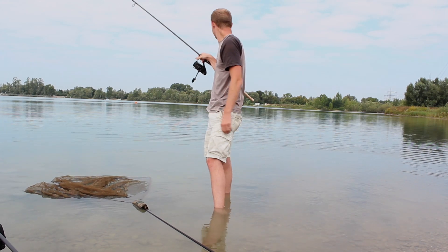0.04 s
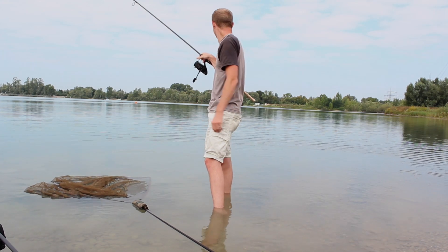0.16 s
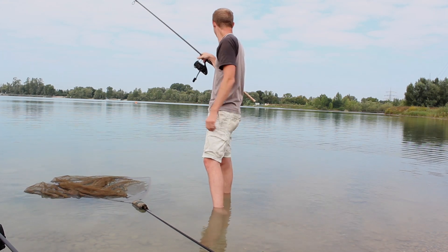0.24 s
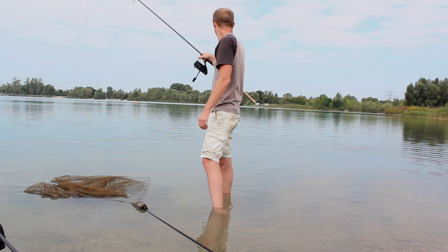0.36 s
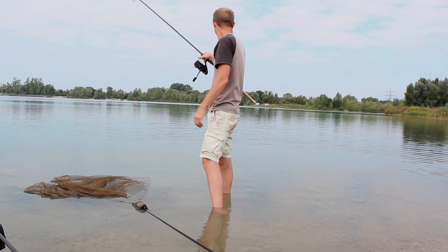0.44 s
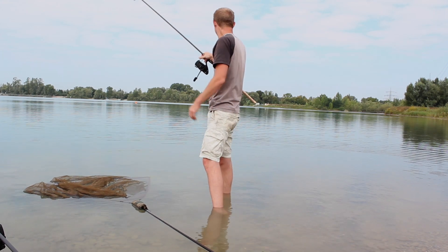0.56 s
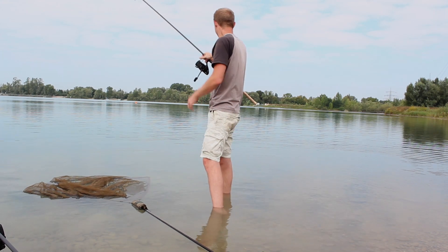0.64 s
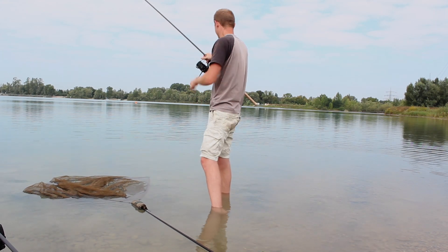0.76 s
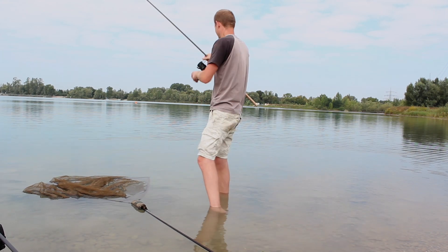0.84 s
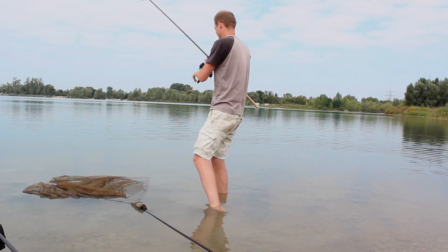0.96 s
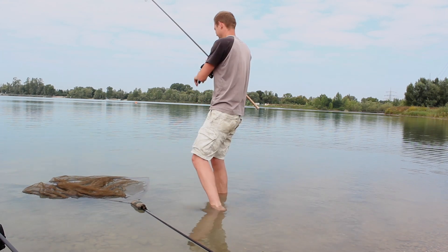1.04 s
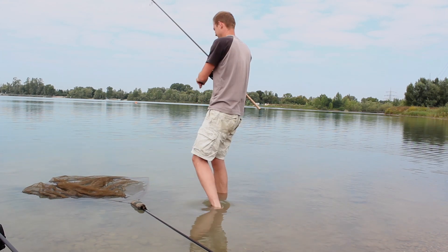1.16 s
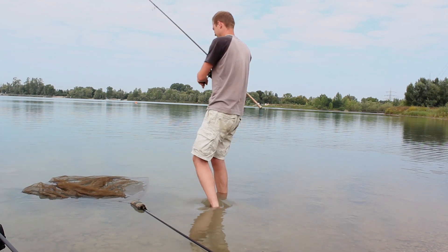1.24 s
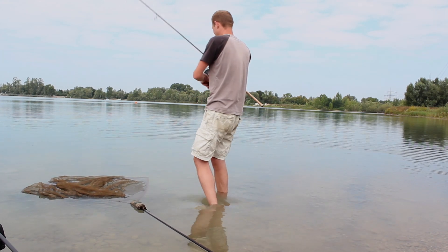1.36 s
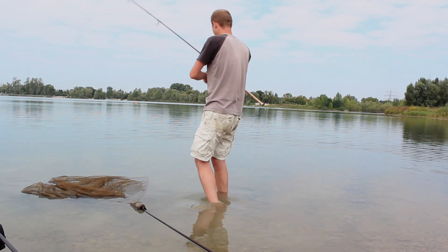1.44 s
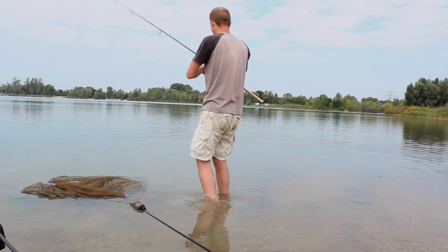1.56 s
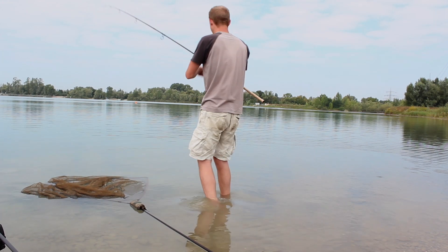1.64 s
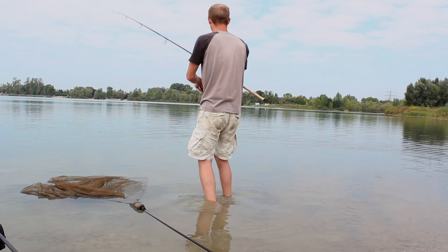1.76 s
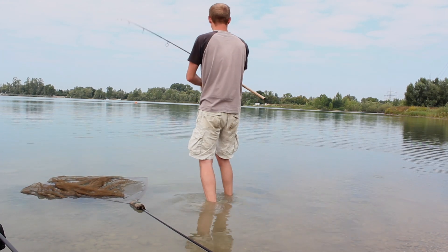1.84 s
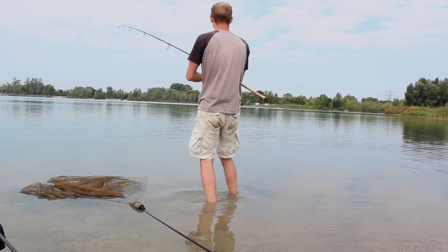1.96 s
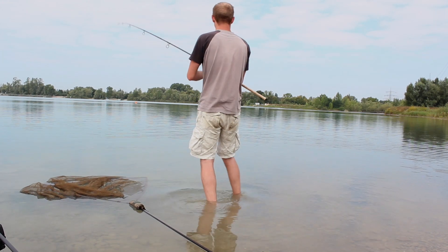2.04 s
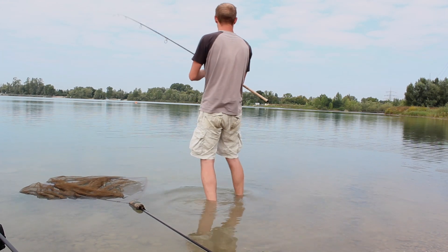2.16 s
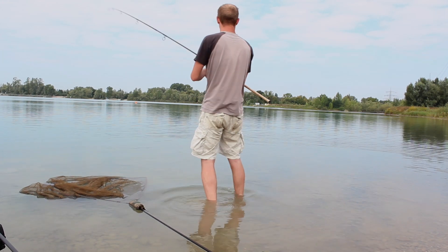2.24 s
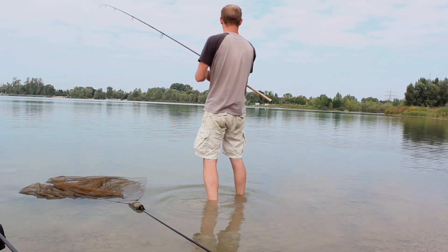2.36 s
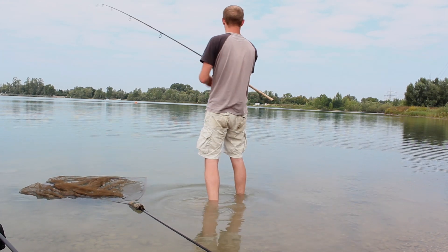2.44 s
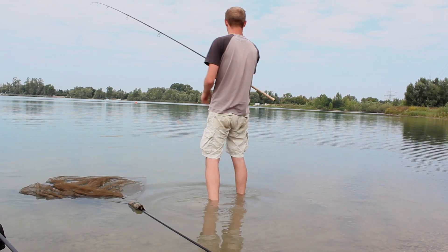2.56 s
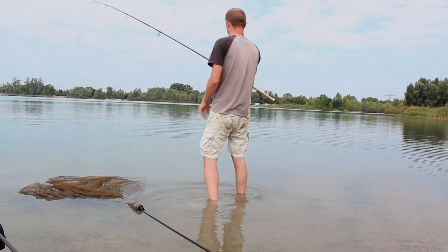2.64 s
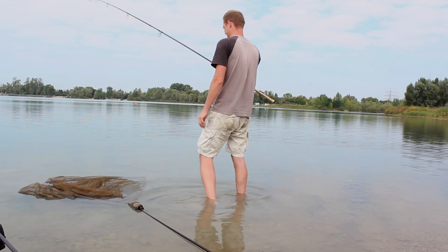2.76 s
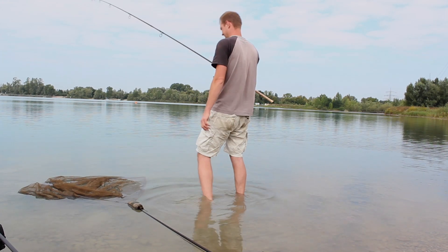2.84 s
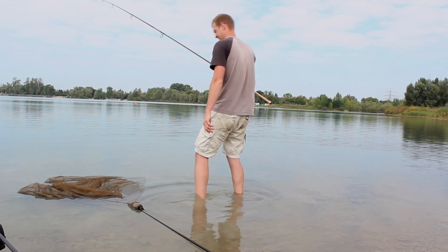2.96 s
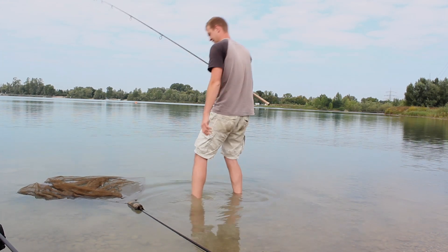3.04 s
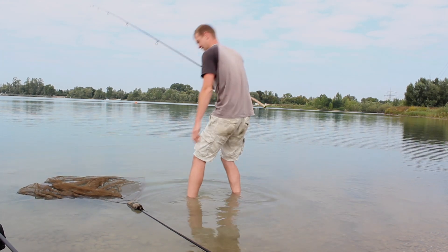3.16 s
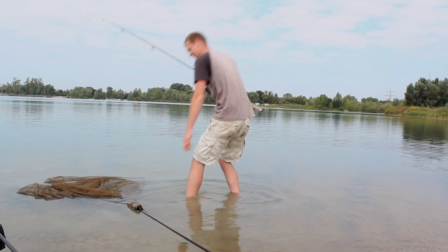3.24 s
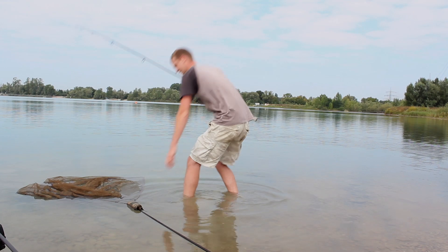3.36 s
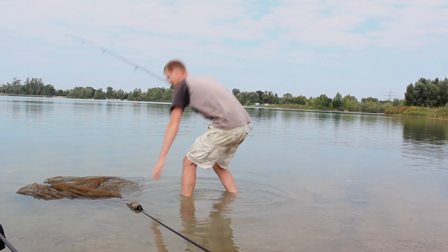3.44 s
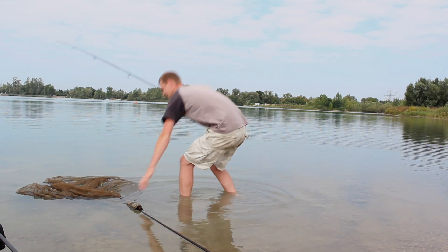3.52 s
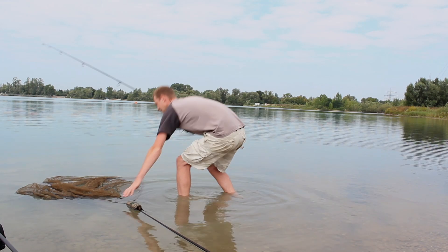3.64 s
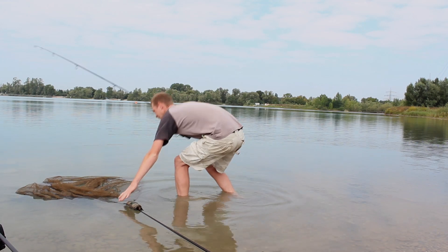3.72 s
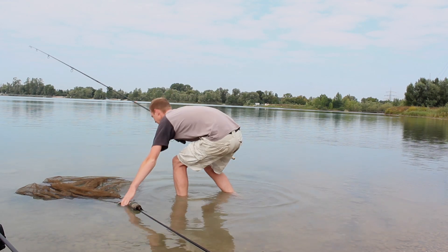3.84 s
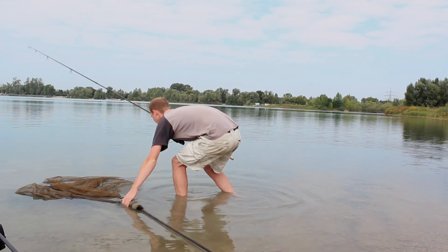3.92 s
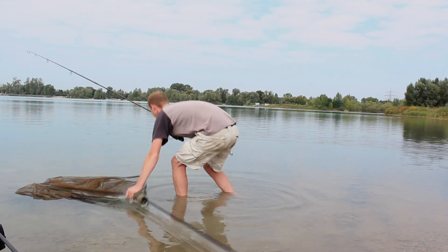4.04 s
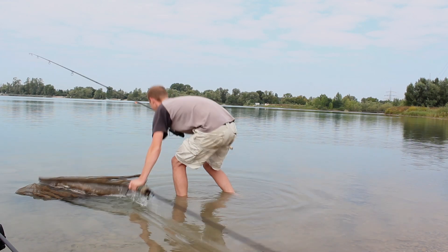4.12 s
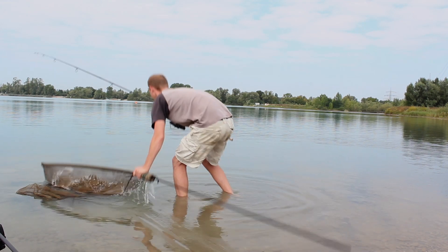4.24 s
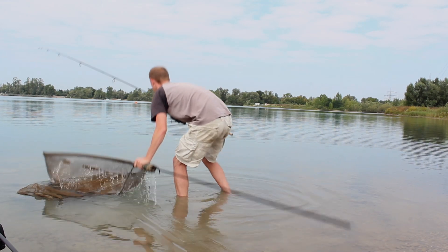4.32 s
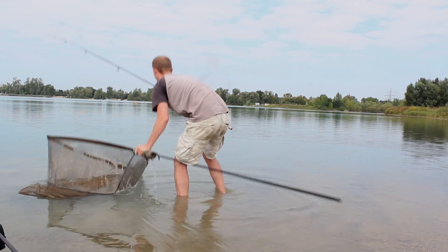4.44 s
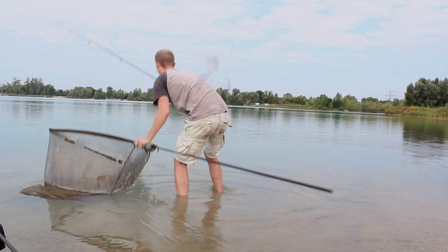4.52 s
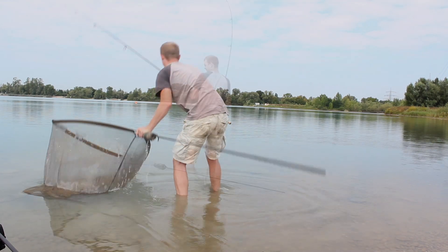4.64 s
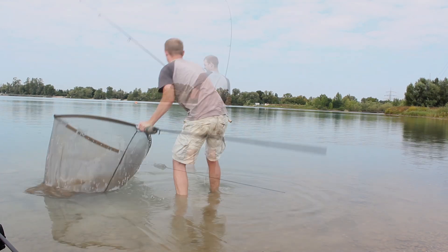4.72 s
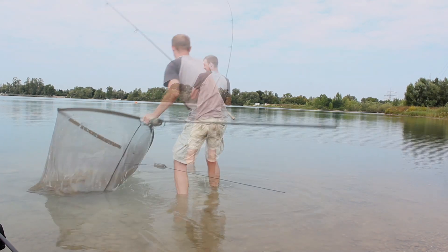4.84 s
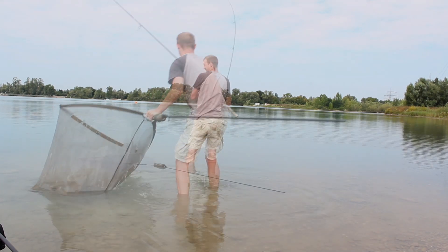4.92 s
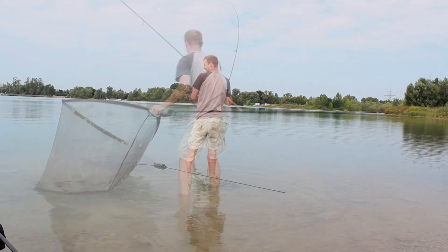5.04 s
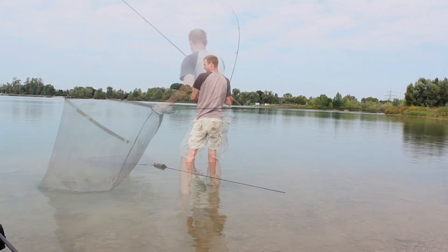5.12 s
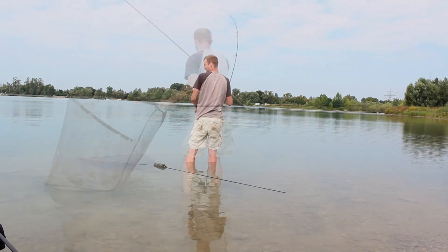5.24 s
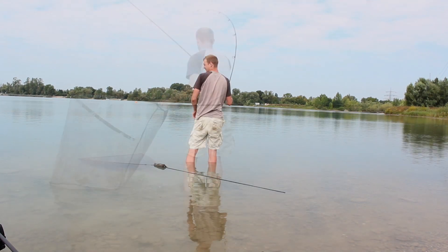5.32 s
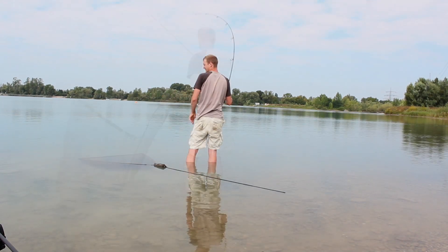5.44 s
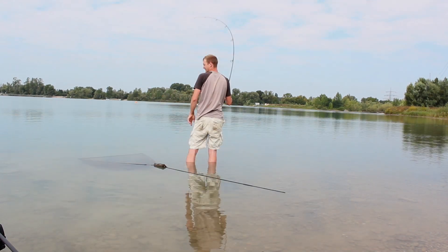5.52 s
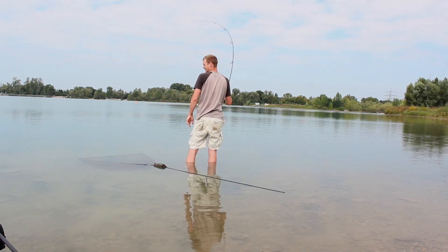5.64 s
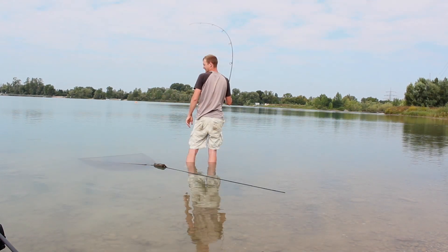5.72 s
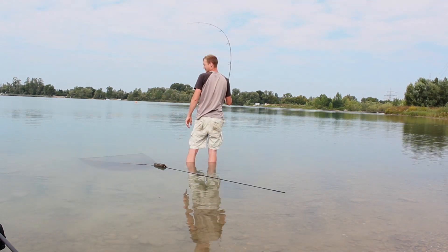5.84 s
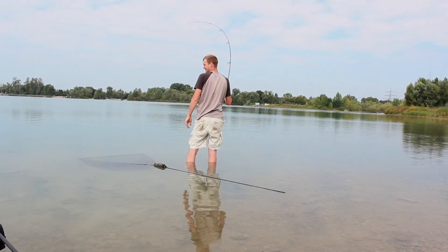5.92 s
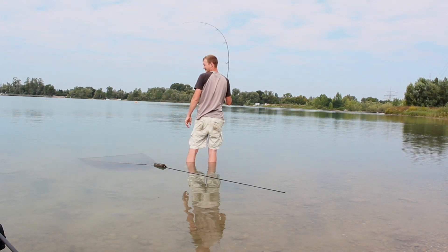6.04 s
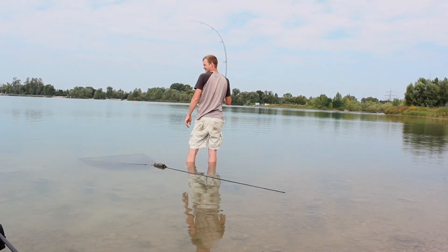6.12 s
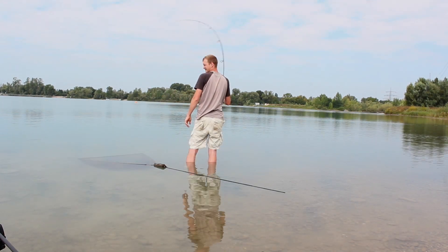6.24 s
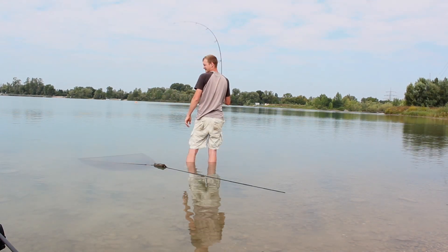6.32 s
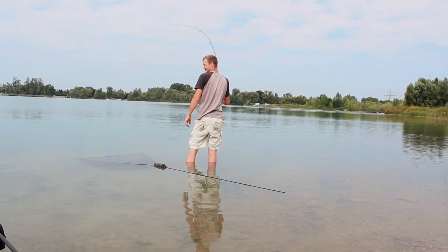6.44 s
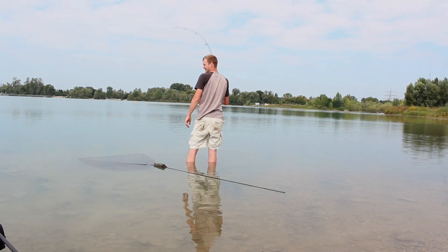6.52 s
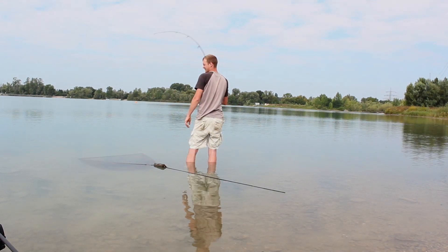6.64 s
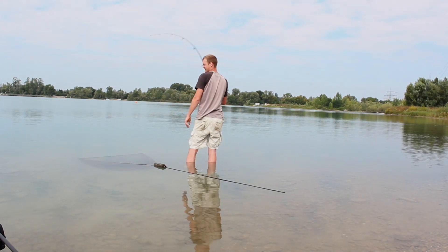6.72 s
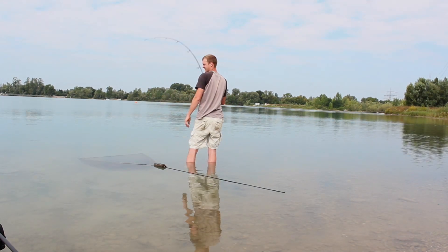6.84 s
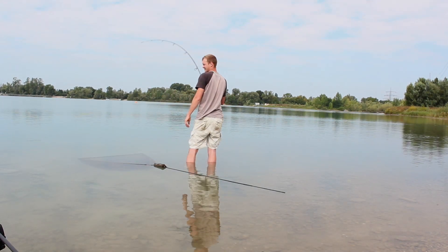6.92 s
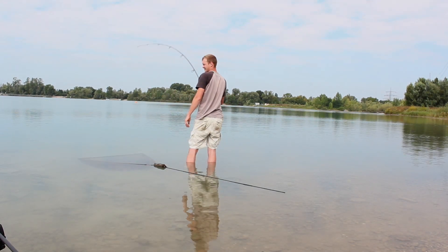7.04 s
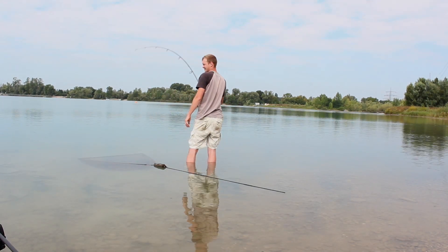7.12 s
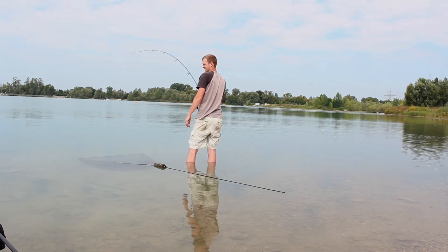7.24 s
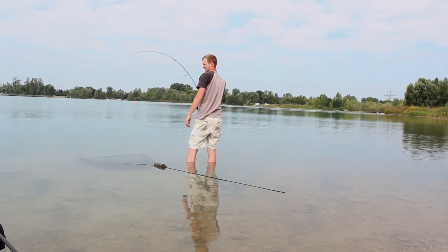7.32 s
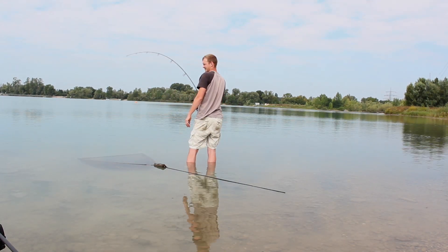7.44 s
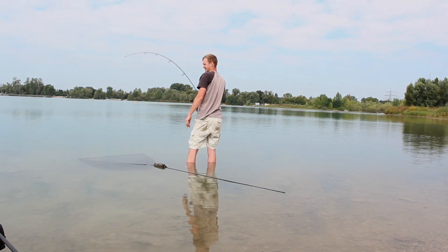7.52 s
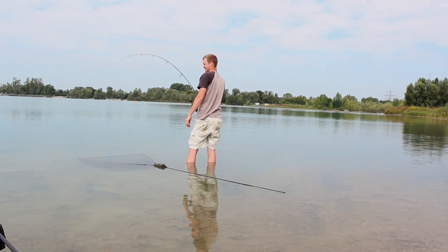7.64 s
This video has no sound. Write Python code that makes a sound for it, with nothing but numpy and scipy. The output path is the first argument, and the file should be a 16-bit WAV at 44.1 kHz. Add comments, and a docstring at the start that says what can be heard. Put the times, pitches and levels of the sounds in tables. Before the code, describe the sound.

Open lakeside, one close microphone with noticeable preamp hiss and a low electrical hum. Light water stirring comes and goes, with tiny bright drops. A net is lifted: two lighter knocks and one sharp, loud, woody crack with a short ringing tail, followed by busy splashing and trickling. It crossfades into a windier moment of soft rumbling gusts and sparse small plips.

```python
"""A person wades in a calm, shallow lake; bubbles plip and legs, hand or net slosh the water.
A far engine drones. Near 4 s a landing net is lifted: its pole knocks three times, the last loudest,
and the water splashes and drains. From 4.44 to 5.5 s this stretch fades into a later, windier one with
no drone; gusts press on the microphone and a few small stirs and bubbles follow.
One microphone feeds both channels through a hissing, humming preamplifier with a limiter."""
import sys
import numpy as np
from scipy import signal
from scipy.fft import rfft, irfft, next_fast_len
from scipy.io import wavfile
from scipy.ndimage import uniform_filter1d

SR = 44100
rng = np.random.default_rng(int(sys.argv[2]) if len(sys.argv) > 2 else 0)


def convert_level_to_amplitude(level_db):
    """Map a level in decibels to its linear amplitude factor."""
    exponent = np.asarray(level_db, float) / 20
    return 10 ** exponent


def wrap_up_sound(samples):
    """Save the sound to the file named by the first command line argument, as 16-bit audio."""
    columns = np.atleast_2d(samples).T
    # keep every value between -1 and 1, then stretch to whole-number steps
    tamed = np.clip(columns, -1, 1)
    steps = np.round(tamed * 32767).astype(np.int16)
    wavfile.write(sys.argv[1], SR, steps)


N = 338280  # length in samples

# Bubbles and drops that stand out close to the microphone, and the ring after the loudest pole knock
# at 4.0339 s. Each row: start in seconds, peak level in dB, pitch in Hz, ring time in ms,
# glide in octaves per ring time.
BUBBLES = [(1.1919, -34, 2150, 1.1, 0), (1.38, -38, 1195, 9.2, -0.023), (1.4014, -39, 1020, 15, 0.053),
           (1.4168, -27.5, 5340, 1.8, 0), (1.448, -31.5, 2170, 5.6, -0.24), (1.45, -42, 760, 20, .3),
           (1.485, -35, 1790, 9.4, -0.066), (1.5143, -31, 946, 7.3, 0.023),
           (1.5268, -34, 2140, 4.1, -0.017), (1.5532, -31, 2800, 3.7, 0.16), (1.6034, -36.5, 1796, 8.9, 0),
           (1.611, -32.5, 3750, 1.3, -0.19), (1.625, -48, 703, 28, 0.9), (1.6322, -37, 3340, 3, -.1),
           (1.639, -29.5, 1250, 1.4, -0.041), (1.6568, -31.5, 1640, 1.3, -.1),
           (1.6974, -38, 2130, 4.8, -0.73), (1.787, -41, 1190, 5.6, .07), (1.81, -44, 810, 21, 0.96),
           (1.863, -41, 4400, 2.1, 0.049), (1.934, -35.5, 1570, 7.8, .1), (1.9702, -41, 4610, 1.7, -.16),
           (2.0905, -37.5, 2540, 5.1, -.1), (2.1756, -28.5, 3660, 1.9, -0.097), (2.2, -48.5, 540, 42, .55),
           (2.1943, -40, 4090, 1.2, -.1), (2.2337, -45, 2240, 8.6, .1), (2.9983, -42.5, 3600, 2.6, -.1),
           (3.0651, -38.5, 630, 31, 0.11), (3.1013, -36, 2830, 3.3, -.1), (3.1128, -46, 790, 26, 0.16),
           (3.1153, -46, 1960, 7.5, .1), (3.1525, -43, 2020, 7.4, -.1), (3.1589, -40.5, 704, 20, -.28),
           (3.166, -28, 2700, 1.2, -0.0066), (3.1677, -35, 5170, 2.5, -0.08),
           (3.1988, -37.5, 3530, 2.3, .08), (3.2082, -36.5, 810, 10, -0.099),
           (3.2441, -39, 3770, 1.1, -0.35), (3.2585, -44, 2400, 3.7, 0), (3.342, -40, 2700, 1.5, 0),
           (3.3503, -40.5, 2440, 8.1, -0.052), (3.857, -21.5, 3920, 0.5, 0),
           (3.8825, -35.5, 480, 7.4, -0.016), (3.8875, -35, 1770, 10.6, -.07),
           (3.9088, -20, 2490, 5.6, .06), (3.98, -37, 1235, 20, .27), (4.0172, -39, 3100, 7.7, .3),
           (4.0339, -15, 1080, 9.4, -0.13), (4.052, -35, 1200, 8, .16), (4.0723, -24, 1580, 4.2, -0.9),
           (4.086, -29, 1680, 6.7, -.06), (4.092, -25, 3040, 1.2, 0), (4.1815, -30, 621, 34, .82),
           (4.1796, -35.5, 3920, 5.7, .24), (4.187, -40, 1850, 19, 0.29), (4.232, -33, 5460, 2, .09),
           (4.2528, -18.5, 5100, 0.45, -.11), (4.2534, -25, 2440, 1.3, -0.037),
           (4.255, -38, 1090, 7.7, 0.075), (4.285, -34, 4160, 2.1, .21), (4.3198, -37, 2280, 4.1, 0),
           (4.347, -34, 1760, 2.4, -0.1), (4.39, -27, 2540, 0.8, 0.24), (4.391, -35.5, 1220, 12, 0.036),
           (4.4058, -18.5, 2520, 1.4, -0.16), (4.4182, -20, 3850, 2, -.13), (4.4603, -27, 2540, 1.8, .17),
           (4.465, -35, 3320, 10, 0), (4.4748, -29, 2370, 4.5, -0.15), (4.476, -17, 4330, 0.51, 0),
           (4.501, -27, 1430, 4.2, 0.12), (4.5246, -24.5, 6250, 1.2, -.09),
           (4.5556, -17.5, 2730, 1.6, 0.04), (4.56, -31, 1250, 4, 0.12), (4.5629, -30, 4780, 1.3, 0),
           (4.588, -28, 2870, 2, -.2), (4.5957, -30, 3600, 2, 0), (4.61, -43, 754, 26, 0.098),
           (4.66, -41, 606, 22, .1), (4.6627, -30, 3200, 2.3, 0.21), (4.698, -34, 3830, .4, 0),
           (4.739, -35, 2800, 2.5, .1), (4.745, -42, 853, 20, 0.41), (4.716, -38, 1550, 6.8, 0.039),
           (4.7638, -31.5, 1560, 3.6, .06), (4.787, -38, 439, 31, 0.67), (4.818, -17.5, 5400, 0.36, 0.068),
           (4.837, -31, 3270, 2.3, -0.51), (4.84, -41, 820, 13, 0.22), (4.857, -22, 4050, 0.6, 0.31),
           (4.894, -30.5, 2720, 2.5, 0), (4.9, -34.5, 960, 8.2, 0.17), (4.981, -43, 956, 17, 0),
           (5.0007, -36.5, 3650, 4.5, 0.16), (5.0994, -38, 1250, 2.9, -0.13), (5.1605, -36, 4080, 2.1, .07),
           (5.208, -43, 660, 10, 0.58), (6.223, -39, 3580, 1.9, .1), (6.244, -36.5, 5560, 3.3, -0.092),
           (6.247, -30, 2460, 3.9, 0.072), (6.2543, -33, 3040, 2.3, 0.14), (6.2747, -36, 1510, 1.2, 0.084),
           (6.314, -42, 867, 27, 0.26), (6.3774, -46, 2070, 6.4, 0.23), (6.4016, -46, 2580, 5.5, -.1),
           (6.425, -44.5, 1960, 9, 0), (6.518, -34, 2330, 5.7, -.1), (6.527, -45, 1520, 11, -.41),
           (6.5848, -39.5, 3320, 1.6, .1), (6.5935, -45, 2620, 8.2, -0.55), (6.607, -48, 960, 25, 0.17),
           (6.6608, -41, 2700, 3.1, -.2), (6.6731, -42, 1380, 6, -0.11), (6.764, -44, 2600, 3.9, 0),
           (6.8344, -48, 3270, 4.6, 0), (6.9653, -44.5, 2430, 5.7, 0.079), (7.044, -46, 2350, 14, -.12),
           (7.0548, -46, 3700, 6.8, -.24), (7.0566, -45, 2680, 10.5, -0.23),
           (7.0691, -40, 3100, 3.4, -0.04), (7.077, -44, 1050, 14, .6), (7.136, -44.5, 2650, 5.2, 0)]


def read(points, hz):
    """Reads a (Hz, dB) curve at hz along a logarithmic pitch axis."""
    f, value = np.transpose(points)
    return np.interp(np.log(hz + 1), np.log(f + 1), value)


def evened(x):
    """Scales x to an rms of 1."""
    return x / np.sqrt(np.mean(x ** 2) + 1e-20)


def coloured(x, points):
    """Filters x by the (Hz, dB) curve in points."""
    size = next_fast_len(len(x))
    gain = convert_level_to_amplitude(read(points, np.fft.rfftfreq(size, 1 / SR)))
    return irfft(rfft(x, size) * gain, size)[:len(x)]


def noise(points):
    """Steady noise with the given power per Hz."""
    return coloured(rng.standard_normal(N) * np.sqrt(SR / 2), points)


def lumpy(samples, depth_db):
    """A gain that wanders at random over about so many samples, by depth_db rms."""
    once = uniform_filter1d(rng.standard_normal(N), samples)
    return convert_level_to_amplitude(depth_db * evened(uniform_filter1d(once, samples)))


def peaked(hz, centre_hz, damping):
    """A resonance with steep flanks, steeper still above."""
    x = hz / centre_hz
    return (1j * x / (1 - x ** 2 + 1j * x * damping)) ** 2 / (1 + .6j * x) ** 3


def add(mix, s, sound):
    """Adds sound to mix from s seconds on."""
    part = mix[round(s * SR):][:len(sound)]
    part += sound[:len(part)]


def bubble(hz, ring_s, glide):
    """A pocket of air rings as a dying sine; one that nears the surface slides up and swells first."""
    t = np.arange(int(3 * ring_s * SR) + 20) / SR
    u = t / ring_s
    turns = np.cumsum(hz * 2 ** (glide * (np.minimum(u, 1.5) - .25))) / SR
    loudest = np.clip(.5 * glide, 0, .6)  # moment of the crest, in ring times
    attack = np.minimum(t * hz / 0.75, 1)  # three quarters of a cycle
    decay = convert_level_to_amplitude(-8 * abs((u - loudest) / (1 - 0.52 * loudest)) ** 1.52)
    return np.sin(2 * np.pi * turns) * attack * decay


def swarm(colour, per_s, cycles, spread_db):
    """Many random small bubbles at 16 pitches, a few of them large; each rings for so many cycles."""
    out, pitches = np.zeros(N), np.geomspace(colour[0][0], colour[-1][0], num=16)
    for hz in pitches:
        when, size, sign = rng.random((int(per_s * N / SR / len(pitches)), 3)).T
        sizes = convert_level_to_amplitude(-spread_db * np.log(size + 0.018)) * np.sign(sign - .5)
        train = np.bincount((when * N).astype(int), sizes, N)
        grain = bubble(hz, cycles / hz, 0.18)
        grain = grain / np.linalg.norm(grain)
        out += convert_level_to_amplitude(read(colour, hz)) * np.sqrt(hz) * signal.oaconvolve(train, grain)[:N]
    return evened(out)


def stirred_water():
    """Trickle, single drops and heavier slosh swell with each movement; spray bursts around BUBBLES."""
    # Movements of legs, hand or net. Each row: start, rise and fall in seconds, crest level of the
    # fine trickle in dB, crest level of the heavy slosh in dB.
    stirs = [(.1, 0.22, .3, -60, -67), (1.2, 0.26, 0.82, -54.5, -53), (1.7, 0.13, 0.46, -57.5, -55.5),
             (2.95, 0.26, 0.74, -61, -54.5), (3.8, 0.18, .1, -49, -47.5), (4.0, 0.15, 0.32, -46, -43.5),
             (4.15, 0.25, 0.41, -41.5, -62), (4.4, 0.16, 0.41, -47.5, -42), (4.6, 0.16, 0.47, -47.5, -45.5),
             (6.15, 0.086, 0.21, -54, -57), (6.3, 0.22, 0.48, -59, -58), (6.8, 0.16, 0.48, -58, -66)]
    # Relative spectrum of the fine trickle. Each row: frequency in Hz, level in dB.
    trickle_colour = [(900, -12), (2000, -0.5), (2800, 4.5), (4500, -2), (6500, -13.5), (12000, -17.5),
                      (16000, -30)]
    # Relative spectrum of the heavy slosh. Each row: frequency in Hz, level in dB.
    slosh_colour = [(250, -8.5), (400, -1), (600, 0.5), (1000, 2.5), (1500, -2), (2200, -9)]
    swell_db = -15  # at the start of the rise and the end of the fall, against the crest
    spatter_db, spatter_s = -20.5, 0.01  # spray around each row: level below its peak, power decay time
    t = np.arange(N) / SR
    trickle, slosh, bursts = np.zeros((3, N))  # power over time
    for start, rise, fall, trickle_db, slosh_db in stirs:
        crest = start + rise
        away = np.maximum(crest - t, 0) / rise + np.maximum(t - crest, 0) / fall
        swell = convert_level_to_amplitude(swell_db * away ** 1.04) ** 2
        trickle += convert_level_to_amplitude(trickle_db) ** 2 * swell
        slosh += convert_level_to_amplitude(slosh_db) ** 2 * swell
    for s, db, *_ in BUBBLES:
        add(bursts, s - .002, convert_level_to_amplitude(db + spatter_db) ** 2 * np.exp(-t[:2000] / spatter_s))
    spatter = evened(lumpy(150, 2.2) * swarm(trickle_colour, 6000, 5.5, 2.8))
    plips = convert_level_to_amplitude(-4) * swarm(trickle_colour, 250, 10, 3)  # scattered single drops
    gurgles = convert_level_to_amplitude(-6) * swarm(slosh_colour, 70, 14, 2.5)  # larger single bubbles
    heavy = gurgles + swarm(slosh_colour, 2000, 4.5, 2.1)
    return np.sqrt(trickle + bursts) * spatter + np.sqrt(trickle) * plips + np.sqrt(slosh) * heavy


def drops_and_knock_details():
    """Bubbles and the loudest knock's ring are dying sines; spray, drops and its crack are noise ticks."""
    # Sharp ticks of spray and drops, and the bright crack of the loudest pole knock at 4.0264 s.
    # Each row: start in seconds, peak level in dB, brightness in Hz.
    ticks = [(1.3252, -38, 5000), (1.3639, -37, 5000), (1.3968, -35, 5000), (1.4372, -38, 4500),
             (1.4858, -31, 4500), (1.5519, -29, 2800), (1.6769, -36, 3500), (1.8345, -44, 5000),
             (1.8843, -37, 3000), (1.9191, -42, 5000), (2.0744, -42, 4000), (2.1755, -28, 5700),
             (3.102, -33.5, 12000), (3.198, -38, 5500), (3.857, -25, 14000), (3.869, -25, 12000),
             (3.877, -29, 10000), (4.0264, -9.5, 10600), (4.12, -26, 11000), (4.2318, -27, 4000),
             (4.2514, -31, 11000), (4.3091, -34, 14000), (4.39, -27, 6000), (4.4185, -28, 6000),
             (4.4726, -26, 8000), (4.526, -35, 8500), (4.572, -38, 10000), (4.6355, -29, 14000),
             (4.7785, -31, 3500), (4.818, -30.5, 11000), (4.8554, -36, 9000), (4.891, -35, 7000),
             (5.038, -34, 5000), (5.1194, -38, 2500), (5.1597, -40, 4500), (6.238, -34, 10000),
             (6.2623, -37, 2600), (6.2995, -44, 4300), (6.538, -46, 2800), (6.942, -45, 3800),
             (7.0011, -40, 3000), (7.1212, -39, 5200)]
    out = np.zeros(N)
    for s, db, hz, ring_ms, glide in BUBBLES:
        add(out, s, convert_level_to_amplitude(db) * bubble(hz, max(ring_ms, .4) / 1000, glide))
    t, hz = np.arange(256) / SR, np.fft.rfftfreq(512, 1 / SR)
    for s, db, bright_hz in ticks:
        burst = rng.standard_normal(256) * np.exp(-t / 0.00035)
        tick = irfft(rfft(burst, 512) * peaked(hz, bright_hz, 1.1))
        add(out, s, convert_level_to_amplitude(db) * tick / abs(tick).max())
    return out


def scattered(x):
    """Ripples and legs throw each sound back within a few hundredths of a second."""
    t = np.arange(1800) / SR
    sparse = rng.random(len(t)) < .06
    taps = rng.standard_normal(len(t)) * sparse * convert_level_to_amplitude(-60 * t / .06) * (t > .0015)
    return x + convert_level_to_amplitude(-15) * signal.oaconvolve(x, taps / np.linalg.norm(taps))[:N]


def pole():
    """Each knock returns along the pole; bending waves carry high notes faster, so returns fall in pitch."""
    # The pole slips and knocks in the hand. Each row: start in seconds, peak level of the blow in dB,
    # brightness in Hz, peak level of the pole's ring in dB, starting level of the splash in dB.
    knocks = [(3.9523, -12, 3630, -22.5, -27.5), (3.9915, -20, 4800, -26, -22.5),
              (4.0265, 3.5, 2620, -0.5, -9)]
    trip_s = .0054  # one round trip of a 1 kHz bending wave
    loss_db, loss_db_per_khz = -5, -1.5  # each trip
    best_hz = 1710  # note carried best
    splash_t60_s = 0.051
    out, hz, t = np.zeros(N), np.fft.rfftfreq(8192, 1 / SR), np.arange(2500) / SR
    lag = 4 * np.pi * trip_s * np.sqrt(1000 * hz)  # phase in radians; delay goes as 1 / sqrt(f)
    trip_db = loss_db + loss_db_per_khz * hz / 1000
    trips = sum(convert_level_to_amplitude(k * trip_db) * np.exp(-1j * k * lag) for k in range(1, 7))
    ring = irfft(peaked(hz, best_hz, 1.34) * trips)[:2500]
    for s, db, bright_hz, ring_db, splash_db in knocks:
        blow = irfft(peaked(hz, bright_hz, 0.65))[:400]
        burst = rng.standard_normal(8192)
        splash = evened(irfft(rfft(burst) * peaked(hz, .6 * bright_hz, 1.5)))[:2500]
        add(out, s, -convert_level_to_amplitude(db) * blow / abs(blow).max())
        add(out, s, convert_level_to_amplitude(ring_db) * ring / abs(ring).max())
        add(out, s + 0.00091, convert_level_to_amplitude(splash_db - 60 * t / splash_t60_s) * splash)
    return out


def wind():
    """Lumpy pressure on the microphone; each gust swells and dies as a bell."""
    # Gusts. Each row: crest in seconds, level in dB ahead of the lumps, half length in seconds.
    gusts = [(4.65, -59, .1), (4.895, -45.5, 0.16), (5.07, -44, .06), (5.19, -46, 0.041),
             (5.374, -40, 0.13), (5.62, -48, .1), (5.85, -56, .2), (6.197, -46.5, 0.24), (6.48, -42, 0.13),
             (6.748, -46.5, .15), (7.055, -43, 0.13), (7.22, -45, 0.079), (7.4, -46.5, .12),
             (7.63, -46, .1)]
    # Power per Hz of a gust whose 65-130 Hz band is at 0 dB. Each row: frequency in Hz, level in dB.
    gust_colour = [(2, -22), (8, -7.5), (35, -8.5), (60, -10.5), (100, -17.5), (130, -24), (200, -32.5),
                   (400, -45), (1200, -100)]
    t = np.arange(N) / SR
    power = sum(convert_level_to_amplitude(db) ** 2 * np.exp(-1.5 * ((t - s) / half) ** 2) for s, db, half in gusts)
    return noise(gust_colour) * lumpy(3000, 1.45) * np.sqrt(power)


def later_share():
    """0 in the first stretch, 1 in the second, with a straight fade between (seconds)."""
    return np.interp(np.arange(N) / SR, (4.44, 5.5), (0, 1))


def faded_noise(points):
    """Steady noise of the first stretch fades into separate noise of the second, alike in colour."""
    later = later_share()
    return (1 - later) * noise(points) + later * noise(points)


def engine():
    """A far engine drones on two orders, pitch and its octave, and fades with the first stretch."""
    # Drifting pitch of the first order. Each row: time in seconds, pitch in Hz.
    drift = [(0, 59.05), (2, 58.2), (3.8, 60.94), (5.5, 61)]
    turns = np.cumsum(np.interp(np.arange(N) / SR, *np.transpose(drift))) / SR
    first = convert_level_to_amplitude(-52) * np.sqrt(2) * np.sin(2 * np.pi * turns)
    second = convert_level_to_amplitude(-61) * np.sqrt(2) * np.sin(4 * np.pi * turns)
    return (1 - later_share()) * (first + second)


def open_air():
    """Steady noise of the open air, with a far road near 1 kHz."""
    # Spectrum of the air. Each row: frequency in Hz, power in dB per Hz.
    air_colour = [(4, -72), (20, -66), (80, -75), (150, -72), (280, -77), (450, -82), (700, -85.5),
                  (1000, -80), (1400, -87), (1900, -94), (3500, -102), (7000, -106), (16000, -110)]
    return faded_noise(air_colour)


def scene():
    """All sounds at the lake reach one microphone, which feeds both channels."""
    close = stirred_water() + scattered(drops_and_knock_details()) + pole()
    return np.tile(close + wind() + engine() + open_air(), (2, 1))


def hiss():
    """Preamplifier noise, separate in each channel."""
    # Spectrum of the hiss. Each row: frequency in Hz, power in dB per Hz.
    hiss_colour = [(30, -130), (120, -105), (220, -93.5), (1000, -95), (5000, -94.5), (16000, -96.5)]
    return np.array([faded_noise(hiss_colour) for _ in range(2)])


def hum():
    """Mains hum, the same in both channels: one steady cosine."""
    mains_hz, peak_db = 49.99, -24.5
    return convert_level_to_amplitude(peak_db) * np.cos(2 * np.pi * mains_hz * np.arange(N) / SR)


def limited(x):
    """Peaks above the threshold turn both channels down a little late; the gain then recovers steadily."""
    threshold_db, recovery_db_per_s, attack_samples = -2.5, 28, 200
    peak_db = 20 * np.log10(abs(x).max(0) + 1e-9)
    fall = np.arange(N) * recovery_db_per_s / SR
    held_db = np.maximum.accumulate(peak_db + fall) - fall
    over_db = np.maximum(held_db - threshold_db, 0)
    # it takes a few ms to act, so the front of a loud knock slips through
    late_db = signal.lfilter([1 / attack_samples], [1, 1 / attack_samples - 1], over_db)
    return x / convert_level_to_amplitude(late_db)


def low_pass(x):
    """Removes everything above the highest recorded frequency."""
    return signal.sosfilt(signal.butter(12, 16630, fs=SR, output="sos"), x)


def record(dry):
    """Hiss and hum join; a limiter ducks everything after the loud knock; then clipping and a band limit."""
    x = limited(dry + hiss() + hum())
    edge = signal.firwin(255, 15900, fs=SR)[None]  # low-pass, Hz
    mix = signal.oaconvolve(np.clip(x, -1, 1), edge, "same")
    return low_pass(mix)


dry = scene()
out = record(dry)
wrap_up_sound(out)
```